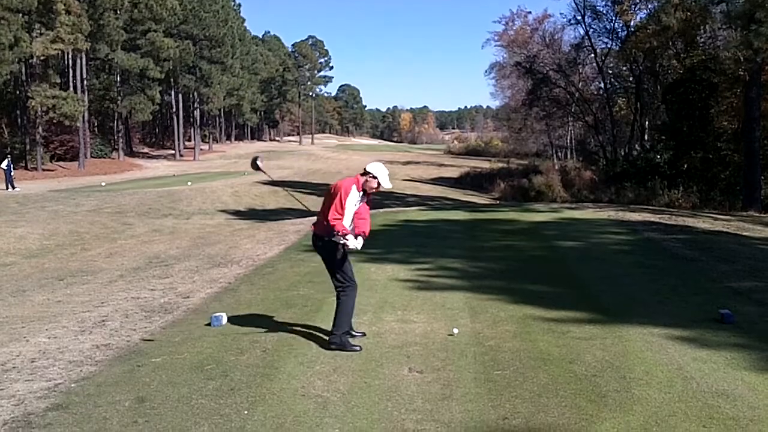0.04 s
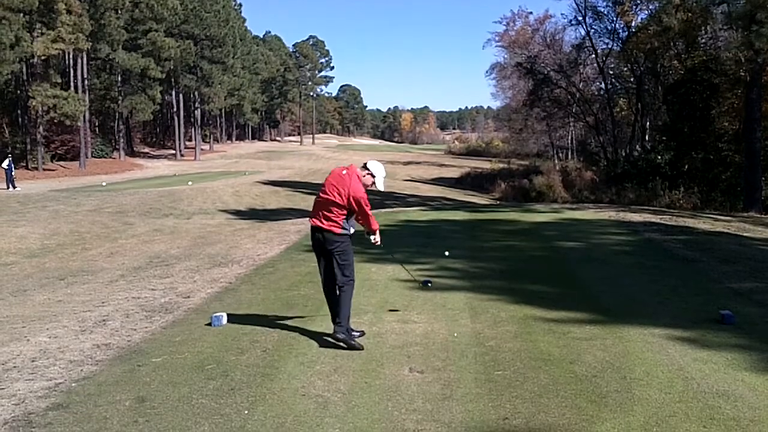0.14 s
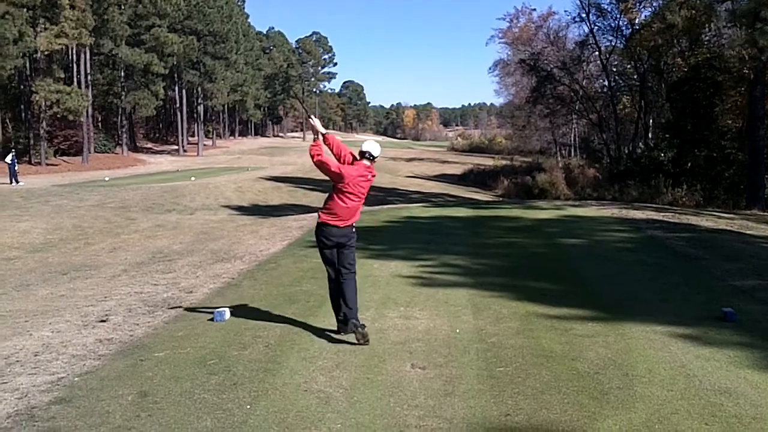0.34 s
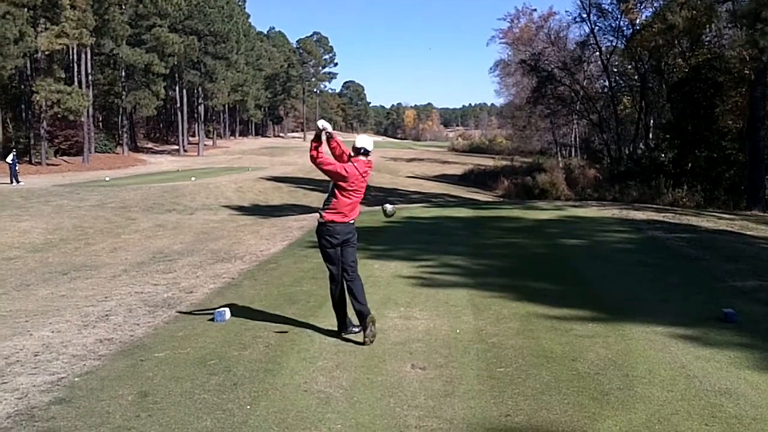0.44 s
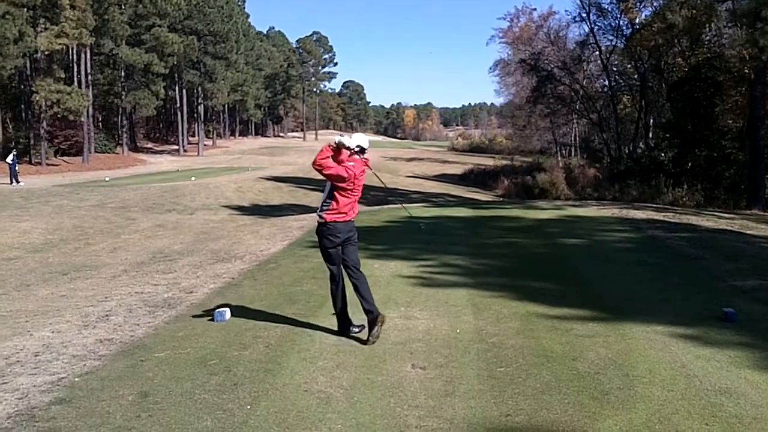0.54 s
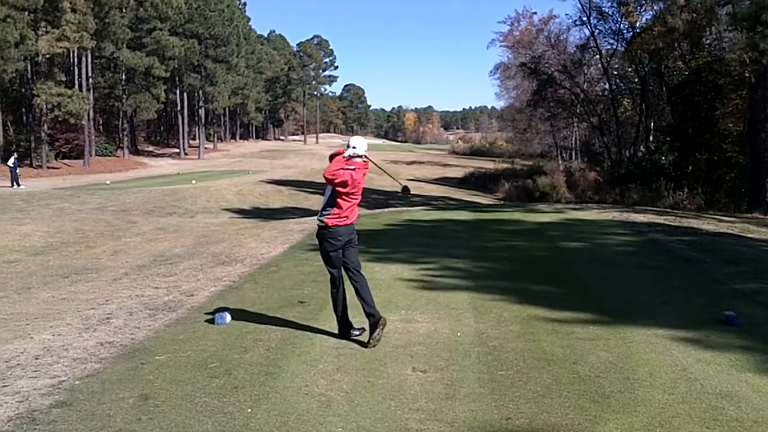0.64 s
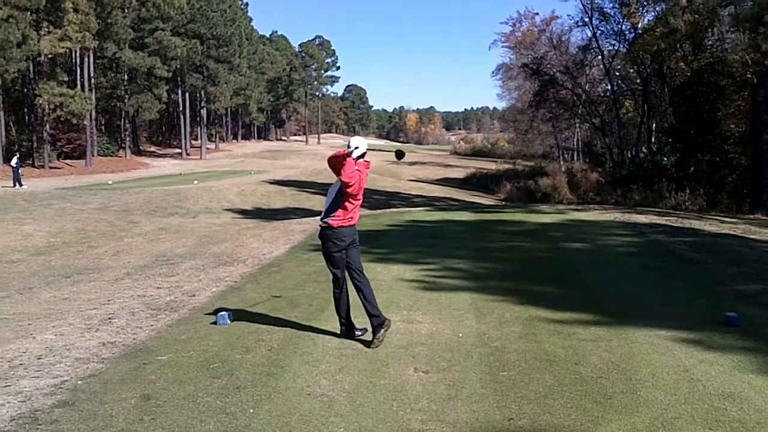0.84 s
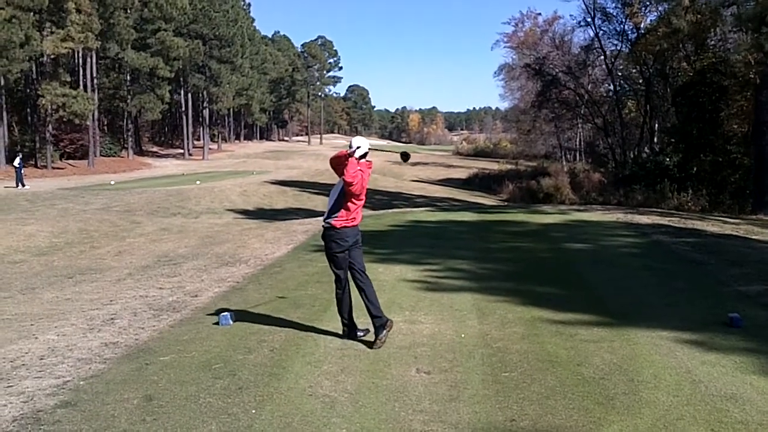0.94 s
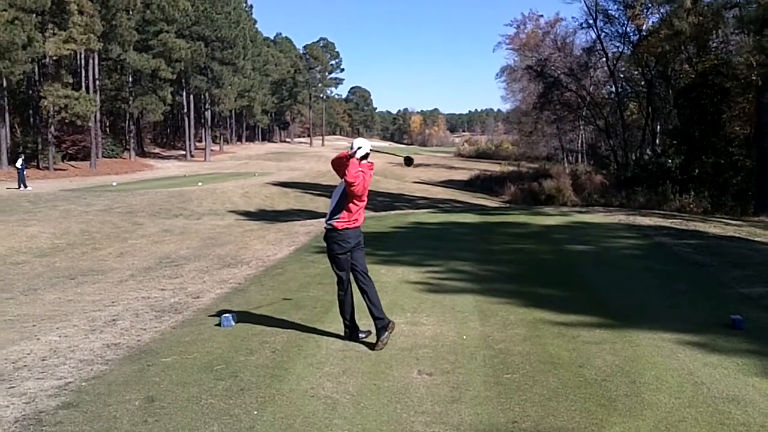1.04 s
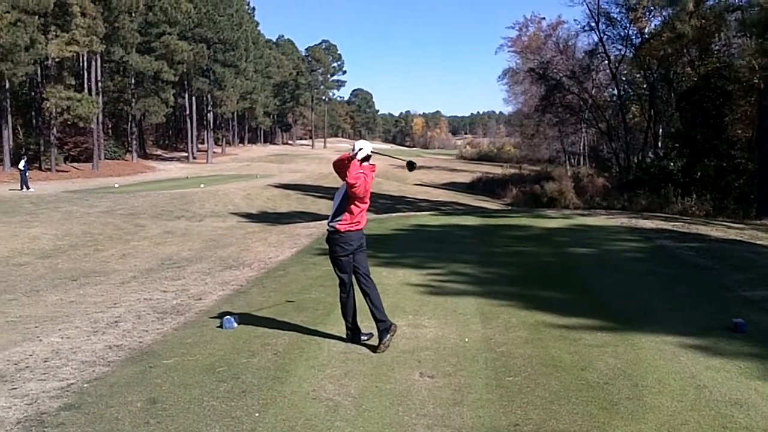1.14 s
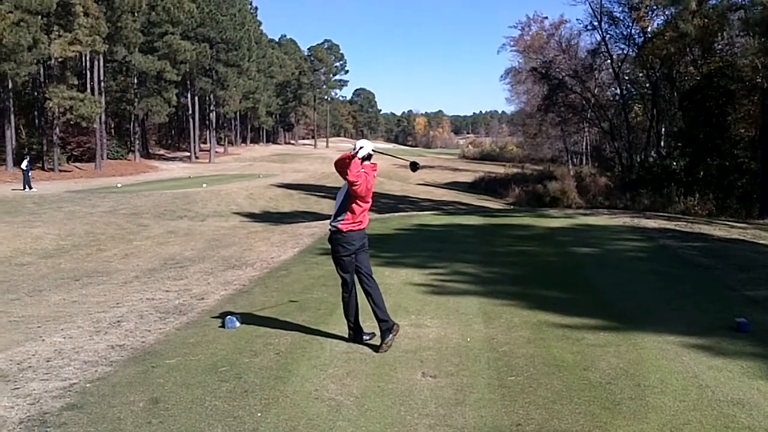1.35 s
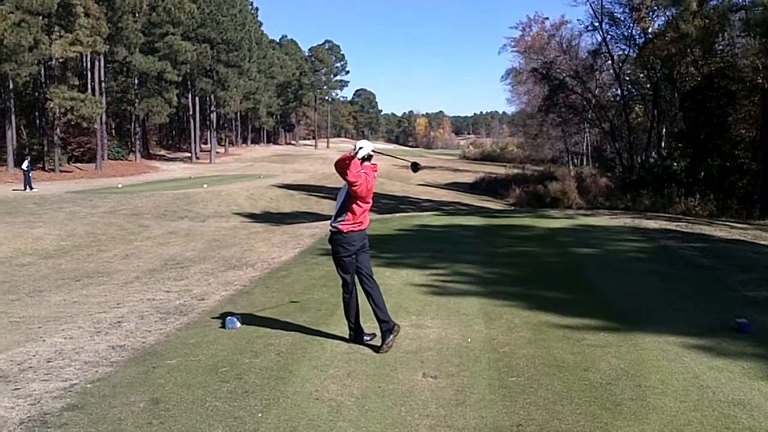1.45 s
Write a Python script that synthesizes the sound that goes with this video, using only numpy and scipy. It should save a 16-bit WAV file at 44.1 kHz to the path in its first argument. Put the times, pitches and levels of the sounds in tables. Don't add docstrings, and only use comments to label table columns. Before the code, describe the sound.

Golf drive on a quiet open course, heard by a camera microphone nearby: rising swish, loud sharp crack with quick ring, fading woodland echo, then soft wind buffeting and one faint bird whistle.

```python
import sys
import numpy as np
from scipy import signal
from scipy.fft import rfft, irfft, next_fast_len
from scipy.io import wavfile
from scipy.ndimage import map_coordinates

SR = 44100
rng = np.random.default_rng(int(sys.argv[2]) if len(sys.argv) > 2 else 0)


def magnitude_from_level(level_db):
    exponent = np.asarray(level_db, float) / 20
    return 10 ** exponent


def master(y):
    cut = np.clip(np.atleast_2d(y).T, -1, 1)
    pcm = np.round(cut * 32767)
    wavfile.write(sys.argv[1], SR, pcm.astype(np.int16))


N = 66150
T = np.arange(N) / SR
HIT_S = .2449


def unit(x):
    return x / np.sqrt(np.mean(x ** 2) + 1e-20)


def along(points, hz):
    f, v = np.transpose(points)
    return np.interp(np.log(hz + 1), np.log(f + 1), v)


def curves(rows):
    s, *cols = np.transpose(rows)
    return [np.interp(T, s, c) for c in cols]


def wobble(rate):
    points = rng.standard_normal(int(N * rate / SR) + 4)
    return map_coordinates(points, [T * rate])


def filtered(x, response):
    pad = SR // 4
    x = np.pad(x, [(0, 0)] * (x.ndim - 1) + [(pad, pad)], "reflect")
    m = next_fast_len(x.shape[-1])
    spectrum = rfft(x, m) * response(np.fft.rfftfreq(m, 1 / SR))
    return irfft(spectrum, m)[..., pad:pad + N]


def noise(spectrum):
    return unit(filtered(rng.standard_normal(N), lambda hz: magnitude_from_level(along(spectrum, hz))))


def wind():
    # t/s, level/dB
    gusts = [(0.0, -58), (0.09, -39), (0.112, -53), (0.182, -38.5), (0.212, -52), (0.242, -39),
             (0.258, -51), (0.274, -53), (0.568, -36.5), (0.58, -49), (0.646, -39), (0.7, -45.5),
             (0.906, -45), (0.994, -54.5), (1.082, -42), (1.106, -57.5), (1.412, -49), (1.5, -59)]
    # f/Hz, level per Hz/dB
    rumble = [(8.8, -32), (15, 3.5), (52, -3.5), (118, -14), (141, -19), (312, -35), (400, -41.5),
              (520, -75), (880, -120)]
    deep = noise([(7.2, -37)] + list(rumble) + [(900, -92)])
    lumps = unit(deep * magnitude_from_level(1.5 * wobble(37)))
    return magnitude_from_level(curves(gusts)[0]) * lumps


def field():
    # f/Hz, level per Hz/dB
    air_colour = [(100, 2), (200, -12), (500, -13.5), (1200, -23), (2200, -25.5), (4000, -28),
                  (7000, -32.5), (14000, -31.5)]
    # t/s, pitch f/Hz, level/dB
    whistle = [
        (1.055, 2100, -95),
        (1.068, 2090, -67),
        (1.1, 2050, -70),
        (1.13, 2100, -75),
        (1.155, 2170, -75),
        (1.19, 2150, -80),
        (1.22, 2130, -95),
    ]
    hum_hz = 121 + 3.5 * wobble(3.7)
    hum = magnitude_from_level(-60 + 3.2 * wobble(60)) * np.sin(2 * np.pi * np.cumsum(hum_hz) / SR)
    hz, db = curves(whistle)
    bird = magnitude_from_level(db + 2.5 * wobble(50)) * np.sin(2 * np.pi * np.cumsum(hz) / SR)
    far_air = magnitude_from_level(-58.5 + .5 * wobble(29)) * noise([(40, -32)] + list(air_colour))
    return far_air + hum + bird


def ticks():
    whine_hz = [5455, 6054, 11568, 13966]
    frame_s, first_s, half_s = 1 / 59.94, .0032, 0.0003
    from_tick = (T - first_s + .5 * frame_s) % frame_s - .5 * frame_s
    tick = magnitude_from_level(-55.5) * np.exp(-(from_tick / half_s) ** 2) * np.sin(2 * np.pi * 9260.7 * T)
    whine = sum(magnitude_from_level(-90) * np.sin(2 * np.pi * hz * T) for hz in whine_hz)
    return tick + whine


def thumps():
    # t/s, level/dB, half length/s
    eddies = [
        (0.088, -37.5, 0.0061),
        (.157, -36.5, .007),
        (0.438, -35.5, 0.0096),
        (0.555, -31.5, 0.0029),
        (.65, -33.5, .009),
        (.82, -31.5, 0.0086),
        (1.076, -38.5, 0.0035),
        (1.394, -41, .005),
    ]
    total = 0
    for s, db, half_s in eddies:
        square = ((T - s) / half_s) ** 2
        total = total + magnitude_from_level(db) * (square - 1) * np.exp(-square / 2)
    return total


def whoosh(db, grow_db, rise_s, air):
    swing_s = .163
    rise = 1 / (1 + np.exp((swing_s - T) / rise_s))
    growth_db = grow_db * (T - swing_s) / (HIT_S - swing_s)
    level_db = db + growth_db - 900 * np.maximum(T - HIT_S, 0)
    return magnitude_from_level(level_db + 2 * wobble(90)) * rise ** 2 * noise(air)


def swing():
    # f/Hz, level per Hz/dB
    shaft_air = [(150, -32), (300, -8.5), (550, 2), (900, -2.5), (1600, -11.5), (3000, -30.5)]
    # f/Hz, level per Hz/dB
    head_air = [(700, -23), (1500, -3.5), (3200, -3), (5000, -1), (7000, -7.5), (10000, -15),
                (15000, -23.5)]
    shaft = whoosh(db=-50.5, grow_db=0, rise_s=.006, air=shaft_air)
    head = whoosh(db=-50.5, grow_db=5, rise_s=0.023, air=head_air)
    return shaft + head


def duck():
    start_s, hold_s, back_s = .195, .06, .12
    sink = np.clip((T - start_s) / (HIT_S - start_s), 0, 1)
    recover = np.exp(-np.maximum(T - HIT_S - hold_s, 0) / back_s)
    return magnitude_from_level(-7 * sink * recover)


def ring(modes, age):
    return sum(magnitude_from_level(db - 60 * age / t60) * np.sin(2 * np.pi * hz * age) for hz, db, t60 in modes)


def contact(age):
    # f/Hz, level/dB, t60/s
    face = [(669.6, -39, .03), (1027, -18, 0.014), (1647, -3.5, 0.0037), (3260, -13, 0.017),
            (4220, -1, 0.0099), (5303, -2.5, .014), (6076, 0, 0.021), (6070, -12.5, 0.018),
            (7000, -8.5, 0.027), (9670, -10.5, .018), (10580, -11, 0.034), (11300, -20, 0.0043),
            (13580, -24.5, 0.0083)]
    push_s, contact_s, free_t60 = 0.00027, .0048, .005
    push = -magnitude_from_level(-1) * np.sin(np.pi * age / push_s) * magnitude_from_level(-9 * age / push_s * (age > push_s))
    crack = magnitude_from_level(-6 - 60 * age / .012) * rng.standard_normal(N)
    onset = 1 - np.exp(-age / 0.00045)
    let_go = magnitude_from_level(-60 * np.maximum(age - contact_s, 0) / free_t60)
    blow = push + (crack - ring(face, age)) * onset * let_go
    blow = blow + magnitude_from_level(-21) * np.roll(blow, round(.0032 * SR))
    return filtered(blow, lambda f: 1j * f / (100 + 1j * f))


def tumbling(modes, age, clock):
    rate = 180
    total = 0
    for hz, db, t60 in modes:
        level = magnitude_from_level(db - 60 * age / t60 + 4 * wobble(rate))
        total = total + level * np.sin(2 * np.pi * hz * clock + .7 * wobble(rate))
    return total


def head_ring(age):
    # f/Hz, level/dB, t60/s
    crown = [(3684, -31.5, 0.096), (3980, -37, .07), (4230, -31.5, 0.093), (4415, -35, .06),
             (4680, -28, .065), (5860, -25, 0.16), (6030, -23, .085), (6200, -23, 0.091), (6400, -18, .04),
             (7100, -37, .1), (9500, -42, 0.046), (9850, -52, .05), (11900, -53, 0.09)]
    # t/s, head speed away from the microphone/(m/s)
    away = [
        (.245, -4),
        (.253, 2),
        (.262, 12),
        (.275, 8),
        (.29, 0),
        (.305, -9),
        (.33, -11),
    ]
    # f/Hz, level per Hz/dB
    rattle_colour = [(300, -12), (1000, -7), (2000, -6), (4000, 0), (7000, -4), (8500, -22), (15000, -40)]
    clock = np.cumsum((age > 0) * 343 / (343 + curves(away)[0])) / SR
    rattle = magnitude_from_level(-40 - 60 * age / 0.29) * noise(rattle_colour)
    fizz = magnitude_from_level(-35 - 60 * age / .085) * noise([(6000, -31.5), (8500, 0.5), (15000, -8)])
    onset = 1 - np.exp(-age / 0.00096)
    return (tumbling(crown, age, clock) + rattle + fizz) * onset


def strike():
    age = np.maximum(T - HIT_S, 0)
    return contact(age) + head_ring(age)


def trees(x):
    # t after the blow/s, level/dB, spread/s
    lines = [
        (.085, -35.5, 0.031),
        (.099, -27, 0.0093),
        (.14, -43.5, 0.042),
        (0.168, -56, 0.037),
        (.23, -53, .03),
        (.31, -50, 0.023),
        (.4, -63, 0.047),
    ]
    # f/Hz, t60/s
    wood_t60 = [(300, 2.84), (1500, 1.8), (4000, .8), (7000, 0.65), (13000, .3)]
    # f/Hz, level/dB
    bark = [(150, -21.5), (500, -1), (1200, 5), (2500, -3.5), (4000, 4), (6500, 7), (9000, -2.5),
            (15000, -14)]
    hz, t, z = signal.stft(rng.standard_normal(N), SR, nperseg=256)
    late = np.maximum(t - .074, 0)
    grow = 1 - np.exp(-late / 0.012)
    decay = magnitude_from_level(-28 - 60 * late / along(wood_t60, hz)[:, None])
    wood = signal.istft(z * grow * decay, SR, nperseg=256)[1][:N]
    clumps = 0
    for s, db, spread in lines:
        side = np.where(T < s, spread / 3, spread)
        clumps = clumps + magnitude_from_level(db) * np.exp(-np.abs(T - s) / side)
    trunks = clumps * noise([(3500, 0), (3 * 3500, -12)])
    answer = (wood + trunks) * magnitude_from_level(2.5 * wobble(330)) * np.sqrt(100 / SR)
    broad = np.roll(answer, round(HIT_S * SR)) * np.sqrt(SR / 1000) * magnitude_from_level(-1.5)
    direct = magnitude_from_level(-17) * signal.fftconvolve(x, answer)[:N]
    return filtered(broad + direct, lambda f: magnitude_from_level(along(bark, f)))


def scene():
    hit = strike()
    return (hit + trees(hit) + swing() + wind() + thumps() + field() * duck())[None]


def low_pass(x):
    return signal.sosfilt(signal.butter(12, 16360, fs=SR, output="sos"), x)


def record(dry):
    # f/Hz, width/Hz, core width/Hz
    notches = [(2713, 1000, 40), (5512, 1000, 60), (7880, 2200, 120), (10940, 1200, 80)]
    top, edge_hz, half_s = .9, 15240, .007

    def mic_mix(f):
        response = 1
        for c, width, core in notches:
            response = response * (c * c - f * f + 1j * f * core) / (c * c - f * f + 1j * f * width)
        return response

    def over(f):
        return np.maximum(f - edge_hz, 0)

    x = filtered(dry, mic_mix) + ticks() * duck() ** 2
    x = x / (1 + np.abs(x / top) ** 8) ** (1 / 8)
    wide = np.exp(-((T - HIT_S - half_s / 2) / half_s) ** 4)
    usual = filtered(x * (1 - wide), lambda f: magnitude_from_level(-33 * np.minimum(over(f) / 100, 2)))
    at_blow = filtered(x * wide, lambda f: magnitude_from_level(-36 * over(f) / 1000))
    return low_pass(usual + at_blow)


dry = scene()
out = record(dry)
master(out)
```